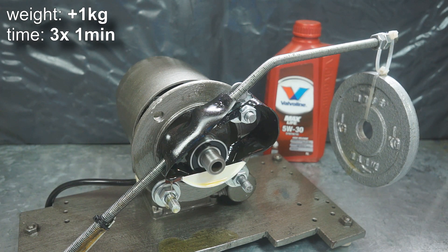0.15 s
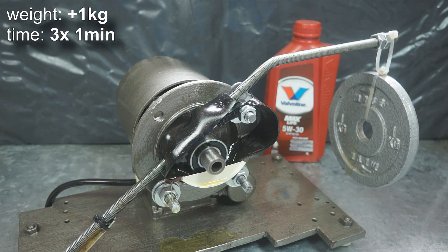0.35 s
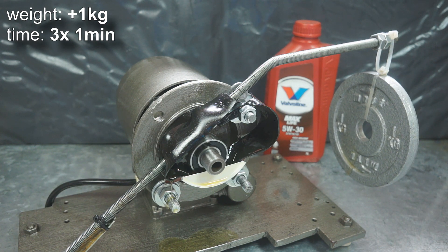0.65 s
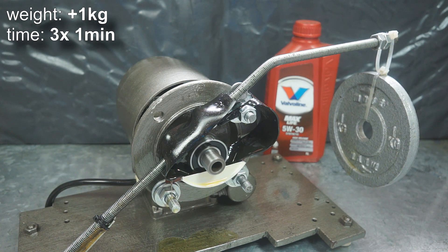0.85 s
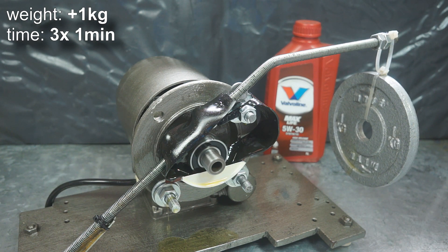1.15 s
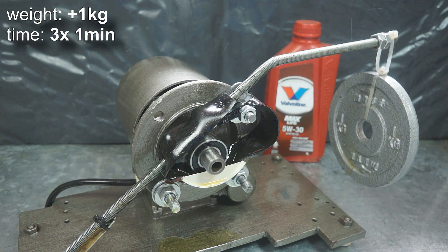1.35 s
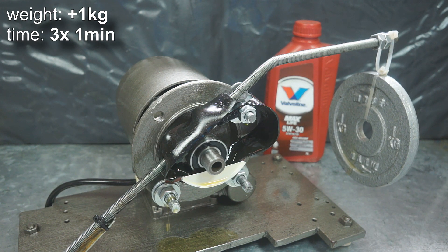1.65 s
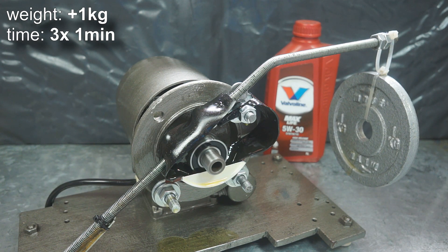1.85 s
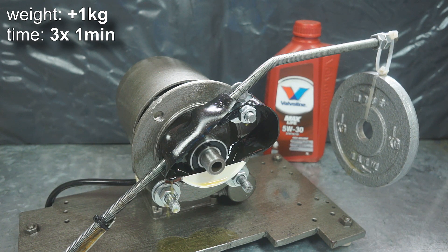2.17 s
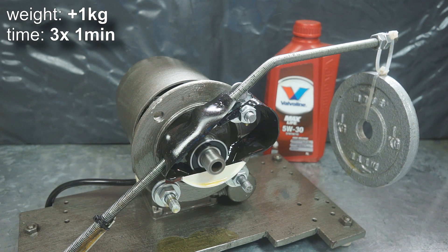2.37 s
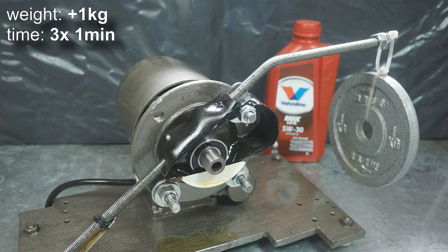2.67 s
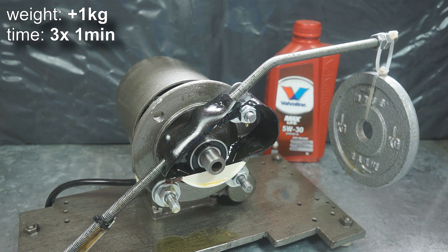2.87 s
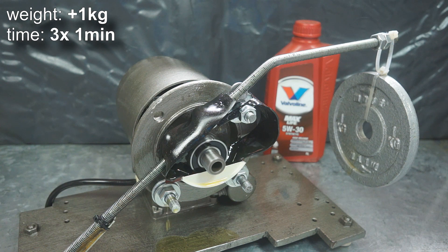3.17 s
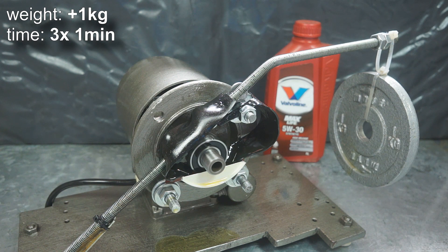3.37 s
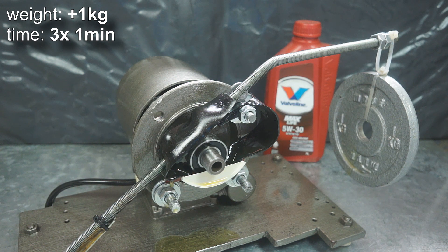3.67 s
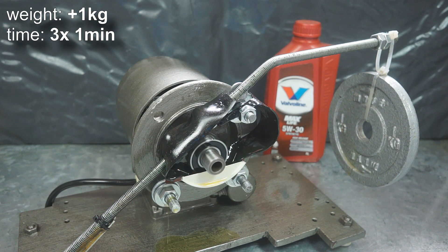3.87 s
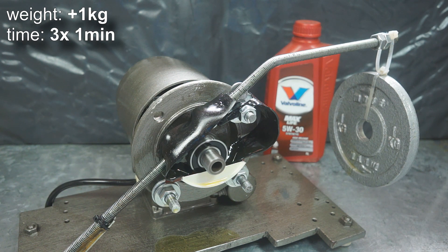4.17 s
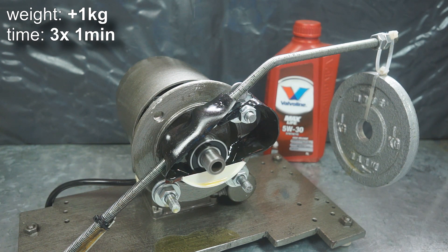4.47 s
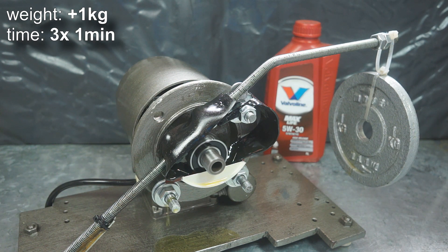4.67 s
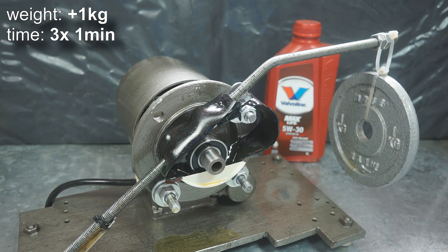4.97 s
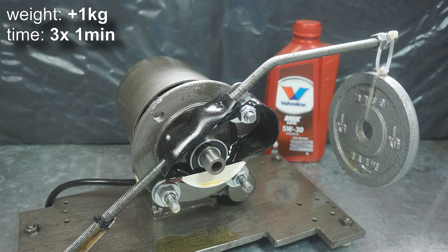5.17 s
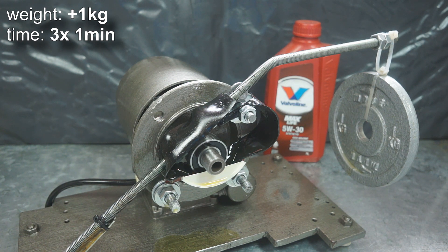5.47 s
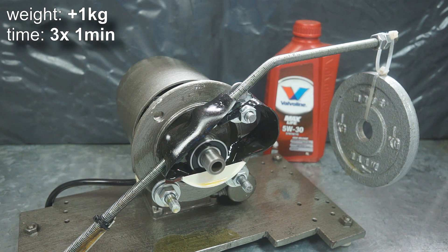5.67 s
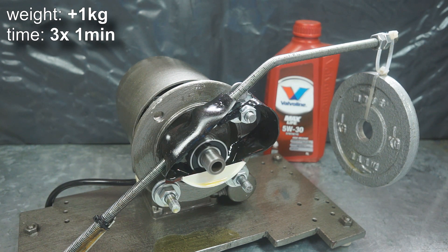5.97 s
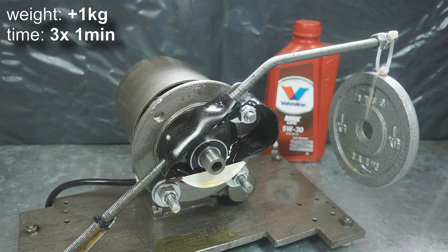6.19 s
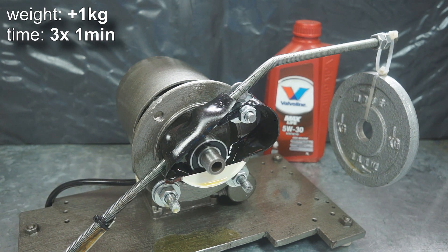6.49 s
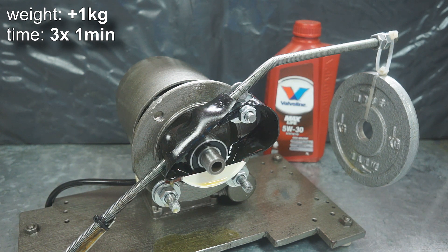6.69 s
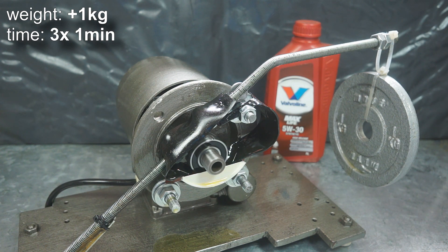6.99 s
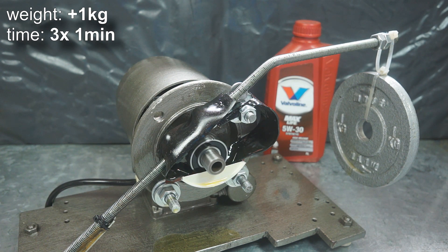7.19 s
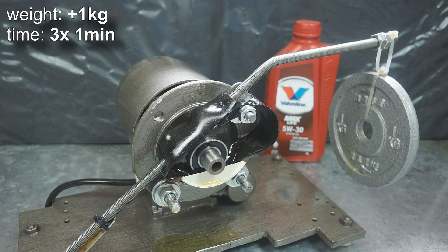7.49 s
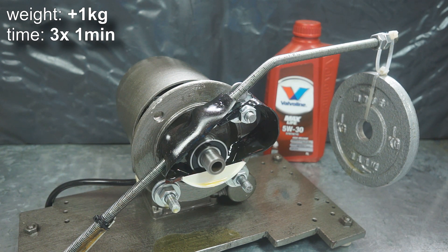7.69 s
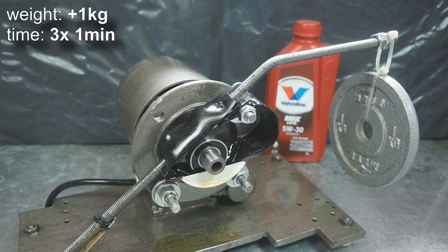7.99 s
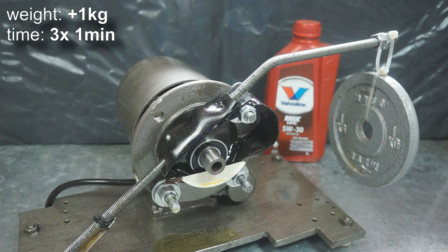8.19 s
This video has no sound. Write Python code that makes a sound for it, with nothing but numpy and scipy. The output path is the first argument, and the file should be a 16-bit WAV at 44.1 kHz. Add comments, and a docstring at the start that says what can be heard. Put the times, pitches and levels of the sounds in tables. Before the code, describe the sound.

A close stereo sound of a bench machine already running, constant for about 8.4 seconds. A motor spins a steel bearing ring against loaded metal: rough grinding and bright hiss, roughened by about 231 ball knocks per second, too fast to count, with a shrill rasp near 5.8 kHz throbbing twenty times a second. Wavering whines at roughly 1.2 and 1.4 kHz ring up in turn. Squeal near 3 kHz, beating about forty times a second, flares at 0.2, 0.5 and 1.4 s, is sparser from 1.5 to 3.8, returns near 4 and 5, and is strong around 5.7-6.2 and 7-8.2. Short scuffs brighten the scrape near 1.4, 3.8, 4.9, 5.6 and 6.2. Tones ease briefly at 2.0, 3.6, 4.8, 7.7 and 8.0. Low motor hum and faint room noise sit underneath, with a very short room tail. It ends still running.

```python
"""Shrill whines and bursts of squeal near 3 kHz ride on a steady rubbing hiss, over the hum of a motor.
An electric motor spins a steel bearing ring against a metal sample that a weighted lever presses on it.
Rolling elements knock about 231 times a second. Squeal, whines and weaker lines are wavering tones;
the rubbing is noise, part of which repeats each turn, pushed by the knocks and coloured by the metal.
A short room tail and faint low room noise lie behind, and two microphone ports hear it all differently."""
import sys
import numpy as np
from scipy import signal
from scipy.fft import rfft, irfft
from scipy.io import wavfile

SR = 44100
rng = np.random.default_rng(int(sys.argv[2]) if len(sys.argv) > 2 else 0)


def dump(signal):
    """Clip the signal to [-1, 1] and save it as 16-bit WAV at the path in sys.argv[1]."""
    limited = np.clip(np.atleast_2d(signal).T, -1, 1)
    pcm = np.round(limited * 32767).astype(np.int16)
    wavfile.write(sys.argv[1], SR, pcm)


N = 367794

TIME = np.arange(N) / SR
FREQ = np.fft.rfftfreq(N, 1 / SR)
# average rates of the turning parts
BALL_PASS_HZ = 231.12
CAGE_HZ = BALL_PASS_HZ / 12
SHAFT_HZ = 49.7
WOBBLE_HZ = 19.9


def amp(db):
    """Turns decibels into gain."""
    return 10 ** (np.asarray(db) / 20)


def unit(x):
    """Scales a signal to rms 1."""
    return x / np.sqrt(np.mean(abs(x) ** 2) + 1e-20)


def spectrum(points):
    """Reads (Hz, value) rows at every FFT bin, with straight lines on a log-frequency axis."""
    hz, value = np.transpose(points)
    return np.interp(np.log(FREQ + 1), np.log(hz + 1), value)


def curves(rows):
    """Reads every column of (seconds, value, ..) rows at every sample."""
    seconds, *columns = np.transpose(rows)
    return [np.interp(TIME, seconds, column) for column in columns]


def arch(middle, length):
    """One smooth rise and fall of height 1."""
    return np.cos(np.pi * np.clip((TIME - middle) / length, -.5, .5)) ** 2


def arches(rows):
    """Adds up the rises and dips of (middle in seconds, length in seconds, dB) rows."""
    return sum(db * arch(middle, length) for middle, length, db in rows)


def flutter(width_hz, size=8192):
    """Complex random motion of rms 1 with a bell-shaped spectrum, made at a low sample rate."""
    hz = np.fft.fftfreq(size, TIME[-1] / size)
    noise = rng.standard_normal(size) + 1j * rng.standard_normal(size)
    return unit(np.fft.ifft(noise / (1 + (hz / width_hz) ** 2)))


def stretched(slow):
    """Spreads a low-rate signal over all samples."""
    return np.interp(TIME, np.linspace(0, TIME[-1], len(slow)), slow)


def motor_clock(wander=0.000498, wander_hz=1.493):
    """Time in seconds as the shaft counts it: the load makes the speed waver a little."""
    speed_change = wander * unit(stretched(flutter(wander_hz).real))
    return TIME + np.cumsum(speed_change) / SR


def tone(hz, clock, fade, fade_hz, rough, rough_hz):
    """A complex line locked to the shaft, with slow fading and a rough skirt from uneven contact."""
    steady = np.exp(2j * np.pi * rng.random())
    size = unit(steady + fade * flutter(fade_hz) + rough * flutter(rough_hz))
    # the root of 2 gives the real part rms 1
    return np.sqrt(2) * stretched(size) * np.exp(2j * np.pi * hz * clock)


# The two squeal tones, which beat about 40 times a second: pitches in Hz.
SQUEAL_PITCHES = [2984.6, 3024.4]
# How loud each squeal tone is between bursts, in dB.
SQUEAL_REST = [-29.0, -28.8]
# Bursts of squeal as the contact grabs.
# Each row: middle in seconds, length in seconds, amount added to the lower tone in dB, to the upper in dB.
SQUEAL_BURSTS = [(0.19, 0.52, -20.5, -29), (0.53, 0.12, -23, -22), (0.78, 0.29, -40, -31),
                 (1.13, 0.26, -29, -52), (1.4, 0.21, -20.5, -40), (1.746, 0.16, -33, -26),
                 (2.172, 0.16, -38, -28), (2.412, 0.21, -26, -34), (2.72, 0.92, -46, -35),
                 (3.36, 0.48, -28, -38), (3.97, 0.15, -45, -21.5), (4.19, 0.29, -34, -24),
                 (4.644, 0.27, -38, -31), (4.924, 0.33, -27, -23), (5.14, 0.25, -24.5, -38),
                 (5.682, 0.33, -19.5, -22), (5.89, 0.52, -21, -43), (6.244, 0.29, -20, -34),
                 (7.102, 0.7, -22, -24), (7.466, 0.64, -20.5, -31), (7.89, 0.58, -23, -41),
                 (8.225, 0.44, -23.5, -36)]


def squeal(clock, level_db=0.0, octave_db=-24, twelfth_db=-34, push=0.18):
    """Stick and slip near 3 kHz, nudged by each ball; the jerky motion adds overtones that grow with it."""
    sizes = amp(SQUEAL_REST)[:, None]
    sizes = sizes + sum(np.outer(amp(dbs), arch(middle, length)) for middle, length, *dbs in SQUEAL_BURSTS)
    swing = sum(size * tone(hz, clock, fade=0.073, fade_hz=4.3, rough=0.36, rough_hz=14)
                for hz, size in zip(SQUEAL_PITCHES, sizes))
    ball_push = push * np.exp(2j * np.pi * BALL_PASS_HZ * clock)
    swing = swing * (1 + ball_push + 0.08 * stretched(flutter(70)))
    turn = swing / (abs(swing) + 1e-9)  # each factor of this moves the squeal up by one harmonic
    octave = amp(octave_db) * turn * stretched(flutter(91))
    twelfth = amp(twelfth_db) * turn ** 2 * stretched(flutter(220))
    return amp(level_db) * (swing * (1 + octave + twelfth)).real


# Moments when one line of the rig rings up and dies back.
# Each row: middle in seconds, length in seconds, pitch in Hz (rounded),
# amount added in dB before the trims of the whine or drone.
RING_UPS = [(0.14, 0.62, 1407, -31), (0.2, 0.75, 925, -31), (0.41, 1.1, 1367, -30), (0.59, 0.36, 1176, -32),
            (0.71, 0.44, 1407, -29), (0.81, 0.3, 925, -32), (0.88, 0.52, 462, -48), (1.15, 0.44, 1176, -25),
            (1.26, 0.3, 1367, -26), (1.49, 0.25, 1407, -29), (1.83, 0.62, 1367, -26), (1.94, 1.4, 462, -45),
            (2.61, 0.44, 1367, -28), (3.05, 0.2, 1176, -27), (3.39, 0.3, 1367, -26), (3.49, 0.3, 1176, -26),
            (4.18, 0.9, 925, -39), (4.41, 0.2, 1176, -28), (4.49, 0.44, 1367, -23), (4.49, 1.4, 462, -47),
            (5.1, 0.62, 925, -30), (5.21, 0.36, 1367, -28), (5.46, 0.16, 1176, -25),
            (5.72, 0.44, 1367, -28), (6.04, 1.4, 1407, -31), (6.23, 0.36, 925, -34),
            (6.26, 0.16, 1367, -28), (6.28, 0.75, 462, -47), (6.9, 0.52, 462, -47), (7.12, 1.1, 1176, -30),
            (7.26, 1.4, 1407, -26), (7.5, 0.3, 925, -33), (7.5, 0.3, 1367, -24)]


def swelling(hz):
    """Amplitude that the swells add to the line at this pitch."""
    return sum(amp(db) * arch(middle, length)
               for middle, length, pitch, db in RING_UPS if abs(pitch - hz) < 2)


# The three loud whines of the rig: pitches in Hz.
WHINE_PITCHES = [1175.5, 1367.3, 1406.6]
# How loud each whine is between its swells, in dB before the overall whine level.
WHINE_REST = [-28.5, -29.5, -30.5]


def whine(clock, level_db=1.4, swell_db=-1.5):
    """Three strong lines that flicker at rest and ring up in turn."""
    out = 0
    for hz, rest_db in zip(WHINE_PITCHES, WHINE_REST):
        size = amp(rest_db) + amp(swell_db) * swelling(hz)
        out = out + size * tone(hz, clock, fade=0.42, fade_hz=6.5, rough=0.38, rough_hz=9.5)
    return amp(level_db) * out.real


# Moments when whine and squeal briefly ease off.
# Each row: middle in seconds, length in seconds, change in dB.
EASINGS = [(1.99, 0.11, -8), (3.62, 0.2, -6), (4.76, 0.35, -4), (7.68, .14, -5), (8.01, 0.12, -6)]


def lulls():
    """Gain that dips whenever whine and squeal ease off."""
    return amp(arches(EASINGS))


# Slow course of the treble of the rubbing; only the changes around each average are used.
# Each row: time in seconds, hiss level in dB, level of the shrill rasp in dB.
TREBLE_COURSE = [(0.0, -31.5, -27), (0.86, -35.5, -27.5), (0.93, -36, -35), (1.25, -35.5, -33),
                 (1.37, -33.5, -29), (1.41, -35.5, -31), (1.58, -35, -33.5), (2.93, -36, -31.5),
                 (3.16, -32.5, -30.5), (3.88, -37, -32.5), (4.3, -33, -26.5), (5.27, -36, -31.5),
                 (5.67, -31.5, -28), (5.9, -33.5, -29.5), (8.11, -31.5, -29), (8.25, -32.5, -33),
                 (8.34, -32, -31.5)]
# Brief scuffs of the contact that brighten the rubbing, before hiss and rasp take their shares.
# Each row: middle in seconds, length in seconds, lift in dB.
CONTACT_SCUFFS = [(0.12, .3, 0), (1.36, 0.11, 4), (3.79, .12, 3.5), (4.47, 0.17, 0.5), (4.887, 0.054, 5),
                  (5.594, .1, 3.5), (6.19, .12, 3.5), (7.22, .35, 2)]


def friction(unsteady_db=0.63, unsteady_hz=3.0, hiss_share=0.67, rasp_share=1.0):
    """Changes in dB of grinding, rasp and hiss: the force wavers at random, scuffs lift the treble."""
    hiss_db, rasp_db = curves(TREBLE_COURSE)
    force_db = unsteady_db * unit(stretched(flutter(unsteady_hz).real))
    scuff_db = arches(CONTACT_SCUFFS)
    rasp_db = rasp_db + rasp_share * scuff_db
    hiss_db = hiss_db + hiss_share * scuff_db
    return [db - db.mean() for db in (force_db, rasp_db, hiss_db)]


def scrape(clock, repeat_hz, repeat):
    """Surface roughness: one part comes round again with each turn, the rest is always new."""
    count = int(SR / repeat_hz / 2)
    track = irfft(np.exp(2j * np.pi * rng.random(count)), 32 * count)  # one turn, finely sampled
    again = np.interp(clock * repeat_hz % 1, np.linspace(0, 1, len(track)), track)
    return unit(repeat * unit(again) + rng.standard_normal(N))


# Colour of the rubbing, before the overall rubbing level.
# Each row: frequency in Hz, relative level in dB per Hz.
RUB_COLOUR = [(30, -105), (120, -88.5), (230, -85.5), (400, -73), (740, -71.5), (880, -59.5), (1600, -58.5),
              (2200, -59.5), (2600, -63), (3500, -57), (7000, -69.5), (7800, -73.5), (11500, -75),
              (13500, -87.5)]
# Resonances and dips of lever and holder that colour the rubbing.
# Each row: frequency in Hz, width in Hz, lift in dB (negative for a dip).
LEVER_MODES = [(437, 32, 3), (578, 50, 7.5), (918, 60, 4.5), (1166, 46, 10), (1466, 31, 8.5),
               (1560, 105, 2), (2600, 230, -2.5), (3000, 147, 12.5), (3950, 170, 2.5), (4630, 150, -4),
               (5380, 200, 4.5), (7076, 620, 7), (9260, 280, 8.5), (10200, 500, 3), (12020, 350, 8.5)]


def rubbing(clock, grind_db, hiss_db, level_db=43.0, split_hz=5200,
            thump_db=1.73, knock_db=2.0, grit_db=0.36, follow=0.97):
    """Grinding and hiss, pushed by each passing ball and coloured by the metal parts."""
    passing = 2 * np.pi * BALL_PASS_HZ * clock
    knock = np.cos(passing) + 0.7 * np.cos(2 * passing) + 0.22 * np.cos(3 * passing)
    grit = unit(stretched(flutter(280).real))
    cage_scrape = scrape(clock, CAGE_HZ, repeat=0.83)
    shaft_scrape = scrape(clock, SHAFT_HZ, repeat=0.63)
    grind = unit(cage_scrape + 0.78 * shaft_scrape)
    grind *= amp(grind_db + thump_db * knock + 0.88 * grit)
    hiss = scrape(clock, 2 * CAGE_HZ, repeat=.62)
    hiss *= amp(follow * hiss_db + knock_db * knock + grit_db * grit)
    treble = 1 / (1 + (split_hz / (FREQ + 1)) ** 4)  # share of the power that is hiss
    drive = np.sqrt(1 - treble) * rfft(grind) + np.sqrt(treble) * rfft(hiss)
    lift_db = sum(db / (1 + (2 * (FREQ - hz) / width) ** 2) for hz, width, db in LEVER_MODES)
    return irfft(drive * amp(level_db + spectrum(RUB_COLOUR) + lift_db), N)


# Shrill resonances of the contact.
# Each row: frequency in Hz, width in Hz, level in dB, throb with each wobble of the bearing in dB.
SHRILL_BANDS = [(5810, 340, -34.5, 2.3), (5785, 45, -37.5, 1.5), (6420, 220, -40.5, 1.5)]


def shrill(clock, rasp_db, follow=1.18, flicker_db=1.5):
    """Bands of screech that throb with each wobble of the bearing and flare at random."""
    throb = np.cos(2 * np.pi * WOBBLE_HZ * clock)
    out = np.zeros(N)
    for hz, width, db, throb_db in SHRILL_BANDS:
        band = unit((stretched(flutter(width / 2)) * np.exp(2j * np.pi * hz * clock)).real)
        flicker = unit(stretched(flutter(6.5).real))
        out += band * amp(db + follow * rasp_db + throb_db * throb + flicker_db * flicker)
    return out


# A wobble of the bearing splits multiples of the ball-pass rate into a line below and a line above.
# Each row: multiple of the ball-pass rate, level in dB before the overall level of these lines.
SPLIT_BELOW = [(4, -40), (5, -35.5), (7, -37), (8, -35.5), (9, -35), (10, -35), (11, -49), (12, -44),
               (14, -31.5), (15, -40), (16, -37), (18, -41), (19, -44)]
SPLIT_ABOVE = [(4, -36), (7, -34.5), (8, -37), (9, -37), (10, -41), (12, -46), (14, -39), (18, -43),
               (20, -47), (21, -48)]
# Further lines of the rig, off that series.
# Each row: pitch in Hz, level in dB before the same overall level.
FURTHER_LINES = [(476, -52), (694, -50), (714, -53), (954, -37), (1020, -46), (1190, -34), (1210, -40),
                 (1468, -42), (1521, -43), (1540, -43), (1688, -40), (1697, -42), (1712, -35), (1943, -44),
                 (2174, -40), (3074, -36), (3085, -35), (3115, -38), (3925, -38), (4023, -44), (4320, -44),
                 (5677, -44), (5777, -41), (5877, -45), (6007, -48), (6238, -47), (6370, -44), (6470, -44)]


def overtones(clock, force_db, level_db=0.5, follow=0.76, rough=0.39, rough_per_hz=.00009):
    """The many weaker lines: each fades by itself, all rise with the force, the high ones are rougher."""
    below = [(order * BALL_PASS_HZ - WOBBLE_HZ, db) for order, db in SPLIT_BELOW]
    above = [(order * BALL_PASS_HZ + WOBBLE_HZ, db) for order, db in SPLIT_ABOVE]
    lines = 0
    for hz, db in below + above + FURTHER_LINES:
        roughness = rough + rough_per_hz * hz
        lines = lines + amp(db) * tone(hz, clock, fade=0.7, fade_hz=3.1, rough=roughness, rough_hz=9.7).real
    return amp(level_db + follow * force_db) * lines


# The two low tones, as multiples of the ball-pass rate.
DRONE_MULTIPLES = [2, 4]
# How loud each low tone is between its swells, in dB before the overall drone level.
DRONE_REST = [-48, -33]


def drone(clock, level_db=0.03):
    """Two low tones on the ball-pass rate, which swell like the whines."""
    out = 0
    for hz, rest_db in zip(np.multiply(DRONE_MULTIPLES, BALL_PASS_HZ), DRONE_REST):
        size = amp(rest_db) + swelling(hz)
        out = out + size * tone(hz, clock, fade=0.16, fade_hz=5.1, rough=0.46, rough_hz=10.7)
    return amp(level_db) * out.real


# Hum of the motor and lines of its shaft.
# Each row: pitch in Hz, level in dB averaged over the ports, left minus right in dB.
HUM_LINES = [(100, -54, -16), (199.3, -63, -11), (249, -72, -5), (299, -70, -3), (85, -78, -10),
             (646, -44.5, -3)]


def hum(clock):
    """The motor's iron buzzes at twice the mains rate, with a few companion lines."""
    out = np.zeros((2, N))
    for hz, db, pan_db in HUM_LINES:
        line = tone(hz, clock, fade=0.014, fade_hz=3.7, rough=0.084, rough_hz=12).real
        ports = amp([[pan_db / 2], [-pan_db / 2]])
        out += amp(db) * line * ports / ports.mean()
    return out


def workshop(x, t60=0.043):
    """A short diffuse tail, different at each port, that falls by 60 dB in t60 seconds."""
    t = TIME[:SR // 3]
    tails = rng.standard_normal((2, len(t))) * amp(-60 * t / t60) * (t > .004)  # starts after 4 ms
    tails /= np.linalg.norm(tails, axis=1, keepdims=True)
    return signal.fftconvolve(x[None], tails, axes=1)[:, :N]


def rumble(level_db=-76, top_hz=130):
    """Faint low room noise, unrelated at the two ports."""
    shape = FREQ / (FREQ + 40) / (1 + (FREQ / top_hz) ** 2)
    return amp(level_db) * unit(irfft(rfft(rng.standard_normal((2, N))) * shape, N))


# How unlike the two microphone ports hear the rig.
# Each row: frequency in Hz, left minus right in dB.
PORT_LEVELS = [(60, -15.5), (92, -16.0), (140, -4), (210, -18), (330, -1), (500, -1), (770, -3), (1170, 2),
               (1790, 2), (2740, 4.5), (4190, 6), (6410, 2), (9810, -0.5), (15000, -1.5)]
# Each row: frequency in Hz, phase by which left leads in radians.
PORT_LEADS = [(0, -1.2), (1380, 0.39), (1640, 0.95), (1980, 0.4), (2500, 0.52), (6120, -0.43),
              (8180, -0.72), (9390, -0.9), (9990, -0.86), (15200, 1)]


def scene():
    """All parts of the rig sound from one place; the ports hear them with unlike colour and phase."""
    clock = motor_clock()
    grind_db, rasp_db, hiss_db = friction()
    noise = rubbing(clock, grind_db, hiss_db) + shrill(clock, rasp_db)
    loud_tones = lulls() * (whine(clock) + squeal(clock))
    tones = drone(clock) + loud_tones + overtones(clock, grind_db)
    room = workshop(amp(-10) * noise + amp(-20) * tones)
    # each port takes half of the difference
    lean = amp(spectrum(PORT_LEVELS) / 2) * np.exp(.5j * spectrum(PORT_LEADS))
    ports = np.array([lean, 1 / lean])
    rig = irfft(rfft(noise + tones + room) * ports / abs(ports.mean(0)), N)
    return rig + hum(clock) + rumble()


def record(dry, edge_hz=15200):
    """The recorder rounds off the highest peaks, then cuts everything above the edge."""
    rounded = dry / (1 + (dry / .95) ** 8) ** (1 / 8)
    lowpass = signal.firwin(1023, edge_hz, window=("kaiser", 9), fs=SR)
    return signal.oaconvolve(rounded, lowpass[None], "same")


dry = scene()
out = record(dry)
dump(out)
```